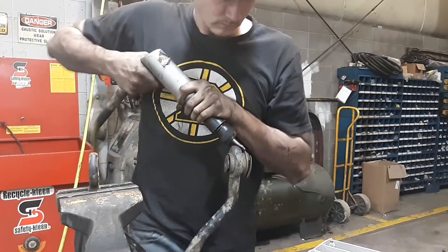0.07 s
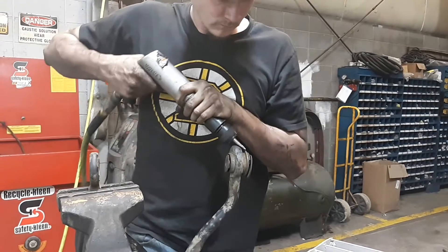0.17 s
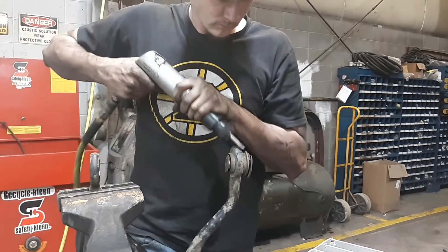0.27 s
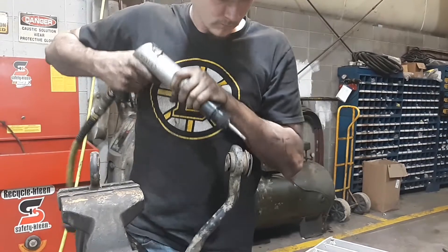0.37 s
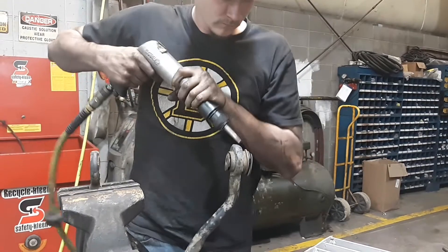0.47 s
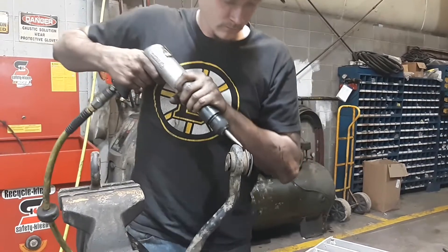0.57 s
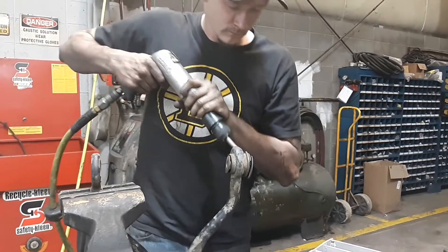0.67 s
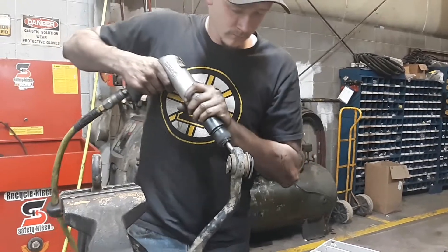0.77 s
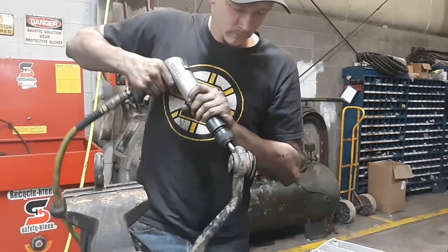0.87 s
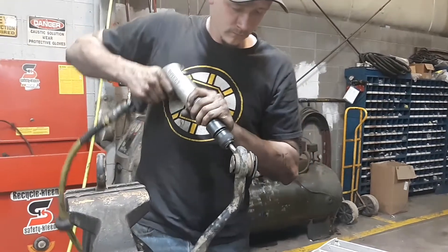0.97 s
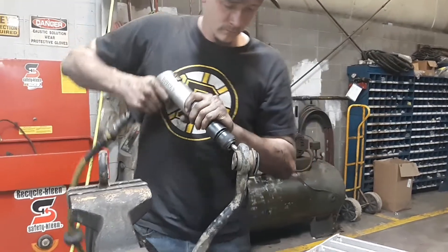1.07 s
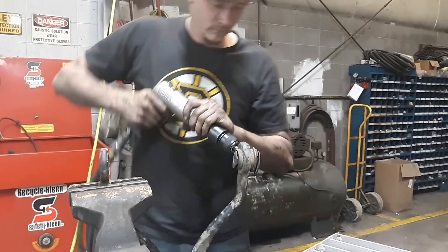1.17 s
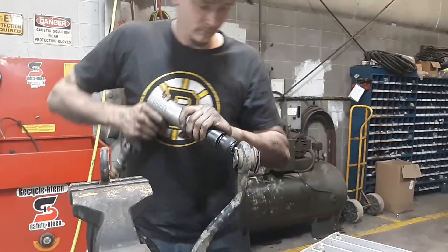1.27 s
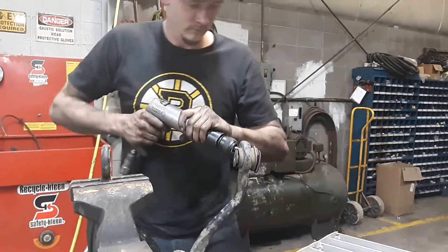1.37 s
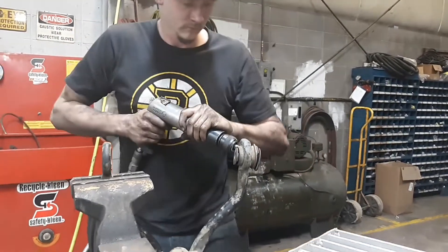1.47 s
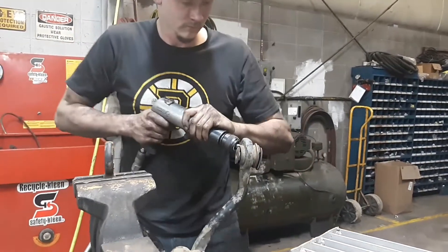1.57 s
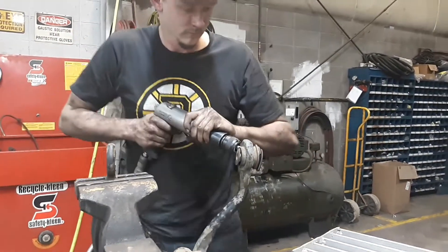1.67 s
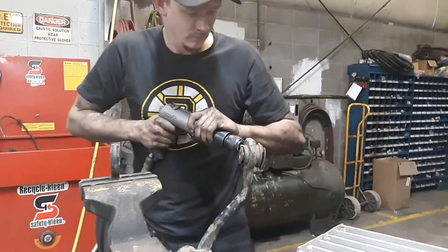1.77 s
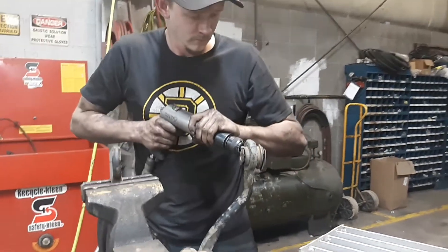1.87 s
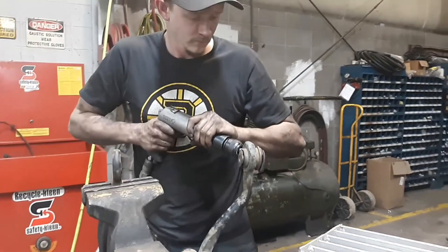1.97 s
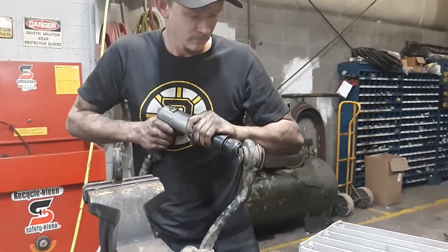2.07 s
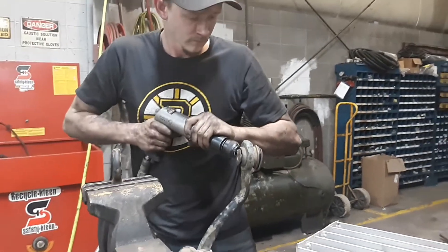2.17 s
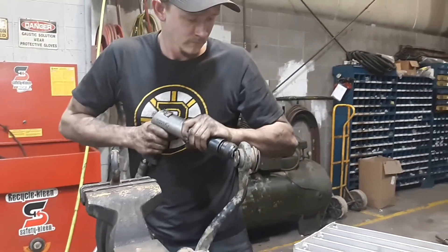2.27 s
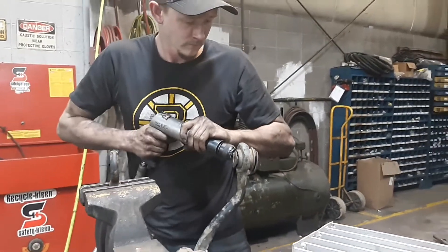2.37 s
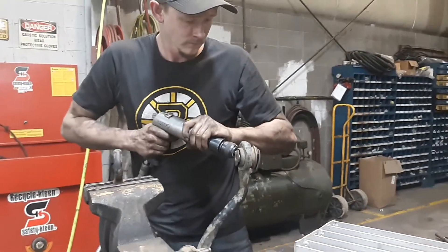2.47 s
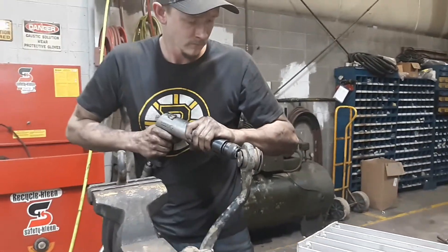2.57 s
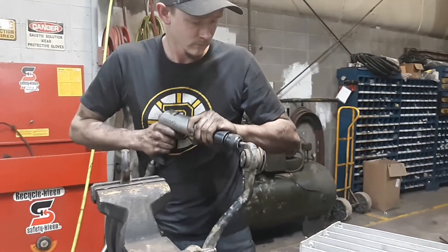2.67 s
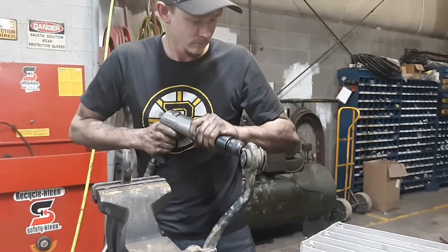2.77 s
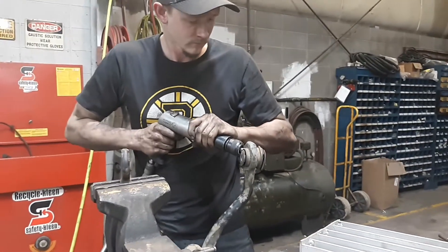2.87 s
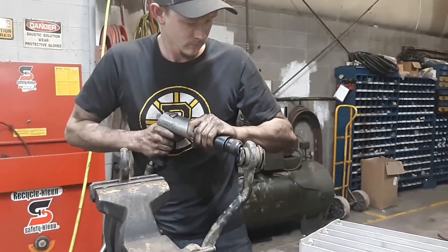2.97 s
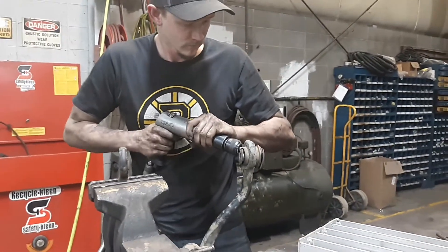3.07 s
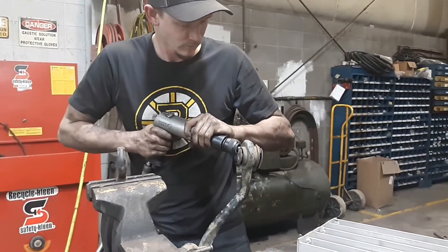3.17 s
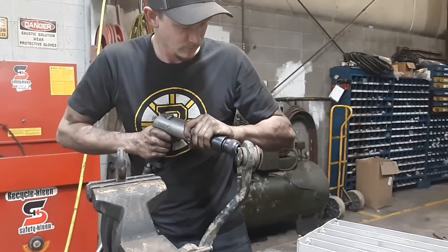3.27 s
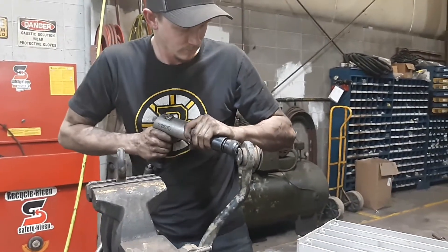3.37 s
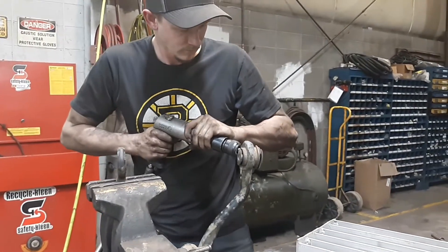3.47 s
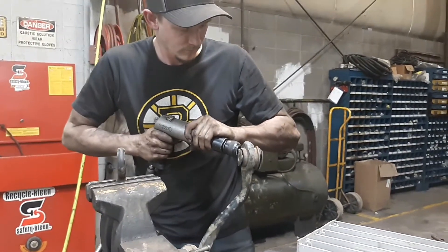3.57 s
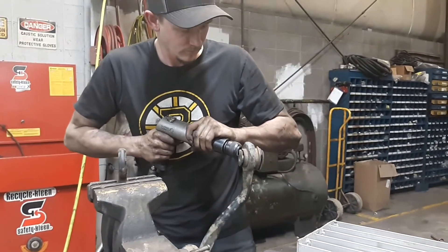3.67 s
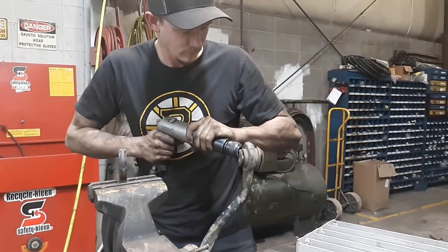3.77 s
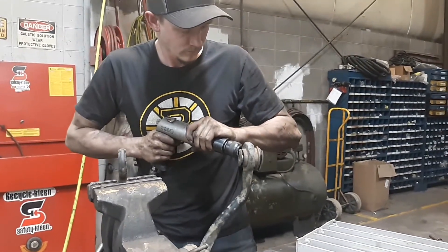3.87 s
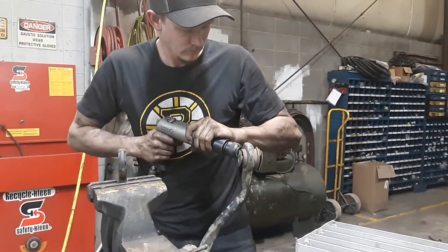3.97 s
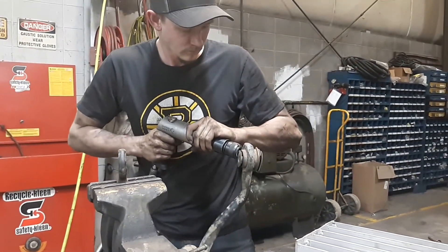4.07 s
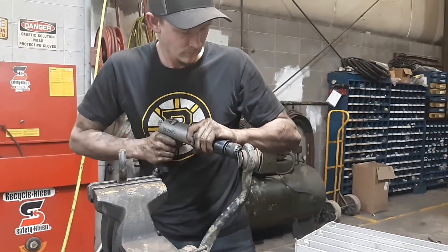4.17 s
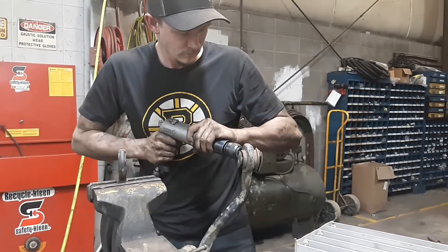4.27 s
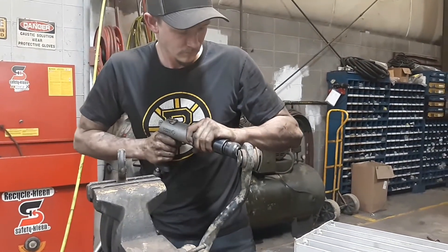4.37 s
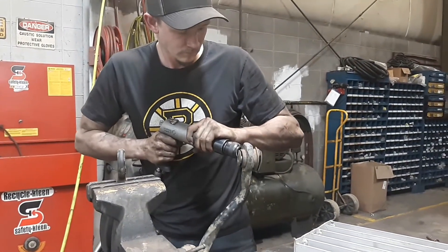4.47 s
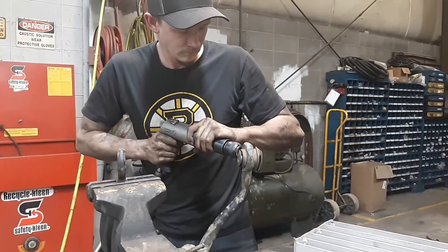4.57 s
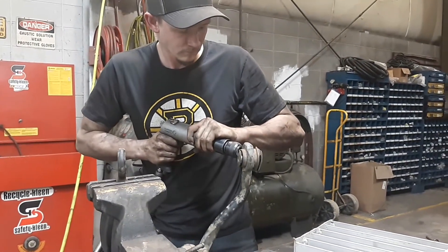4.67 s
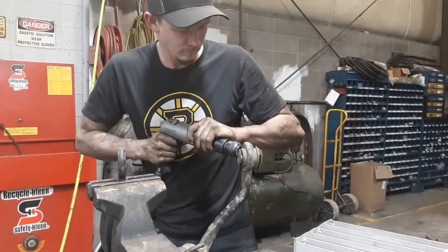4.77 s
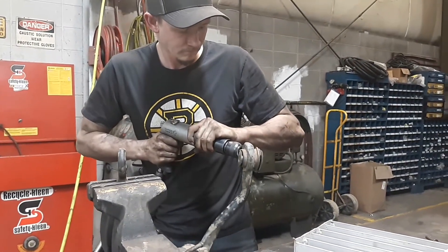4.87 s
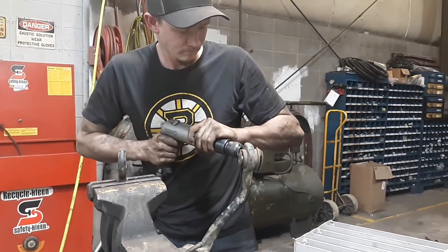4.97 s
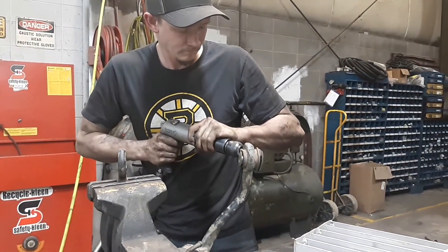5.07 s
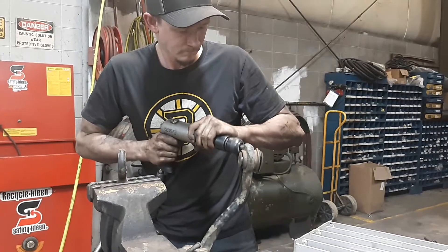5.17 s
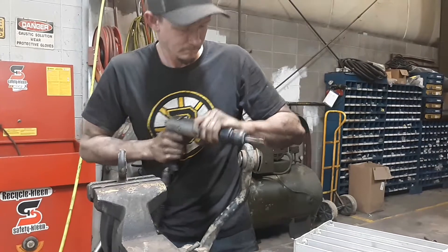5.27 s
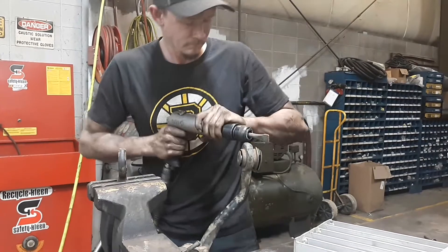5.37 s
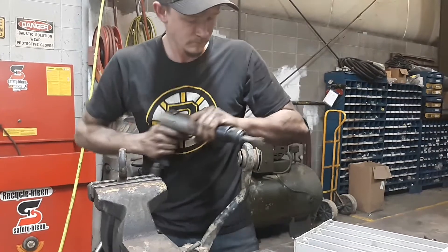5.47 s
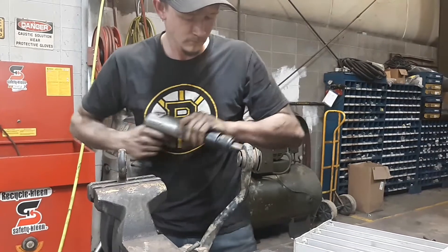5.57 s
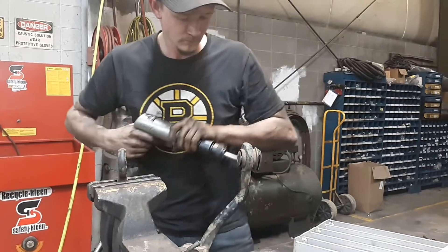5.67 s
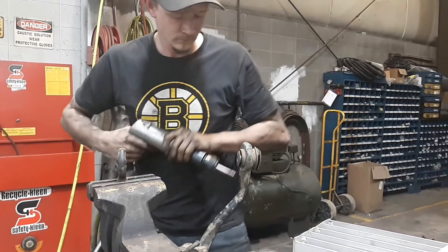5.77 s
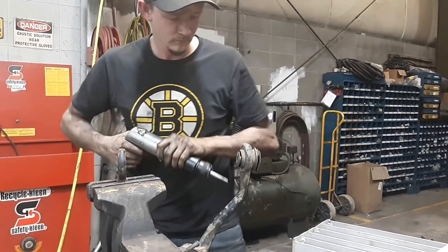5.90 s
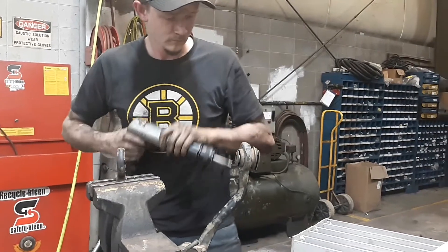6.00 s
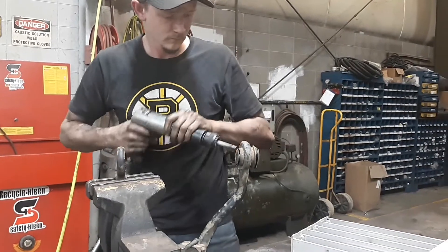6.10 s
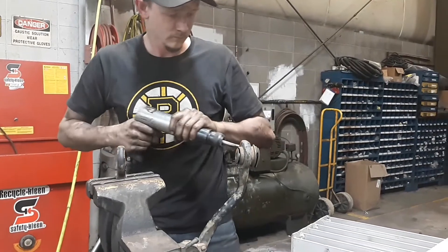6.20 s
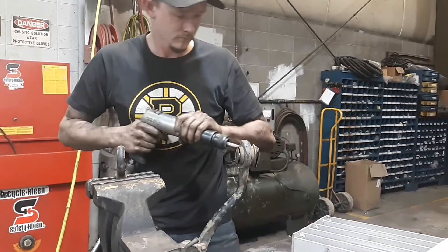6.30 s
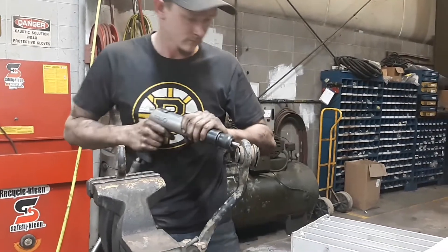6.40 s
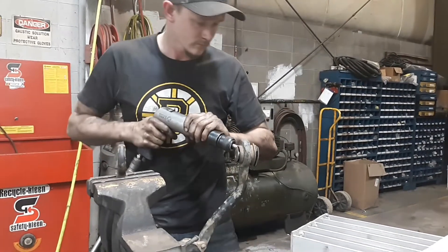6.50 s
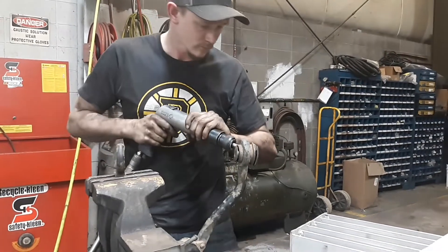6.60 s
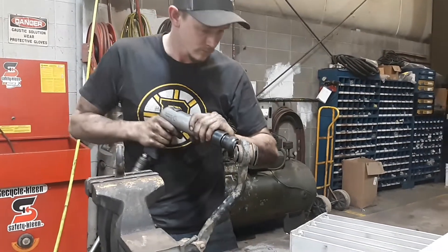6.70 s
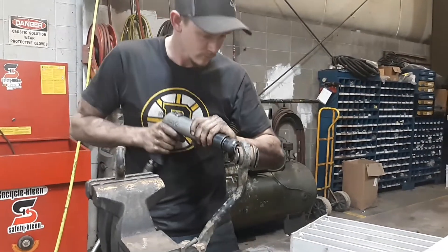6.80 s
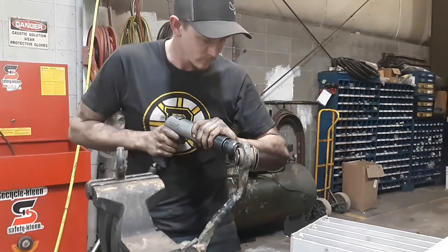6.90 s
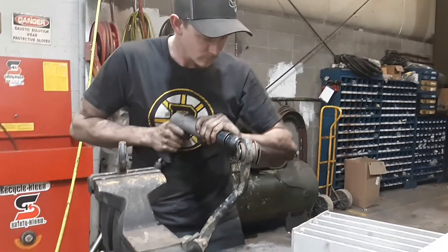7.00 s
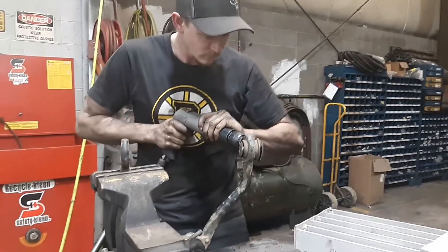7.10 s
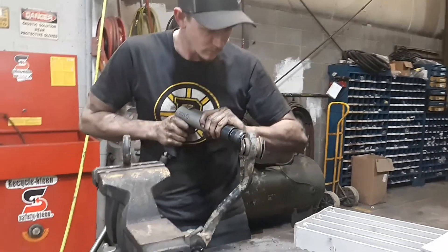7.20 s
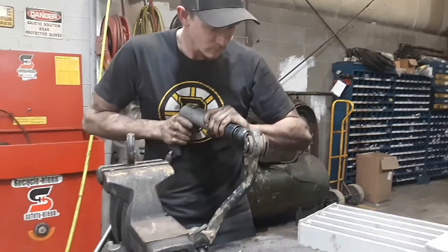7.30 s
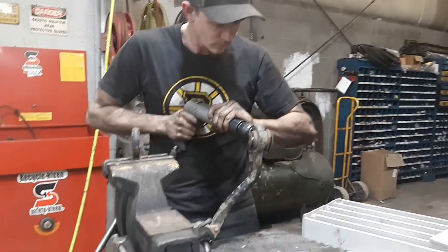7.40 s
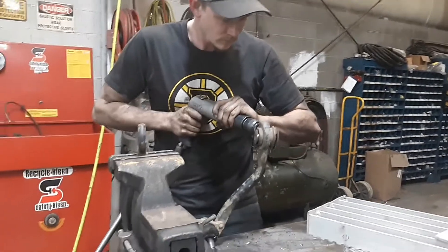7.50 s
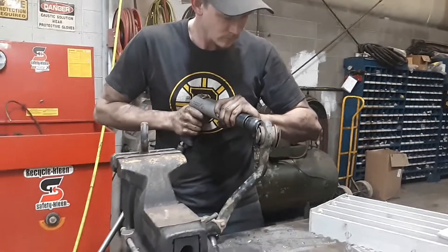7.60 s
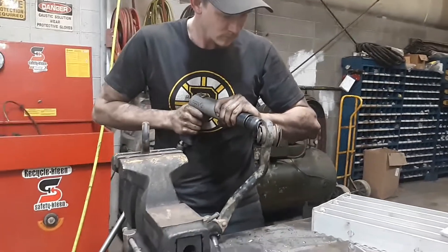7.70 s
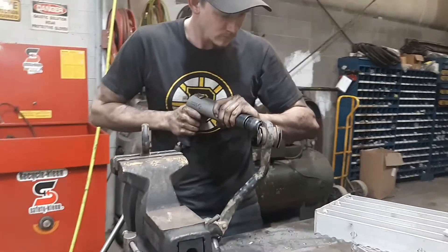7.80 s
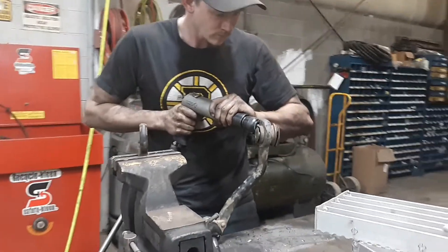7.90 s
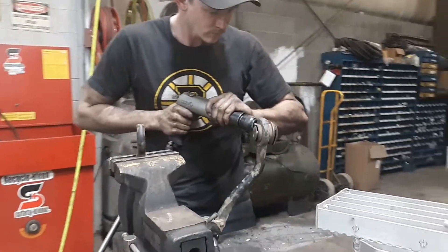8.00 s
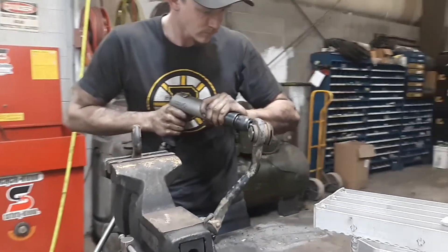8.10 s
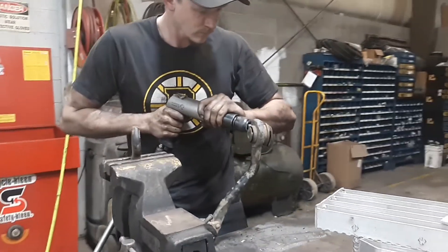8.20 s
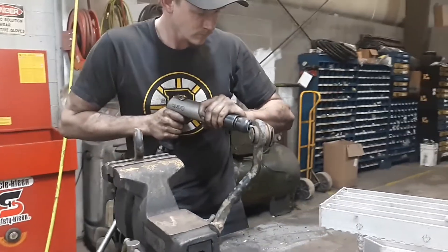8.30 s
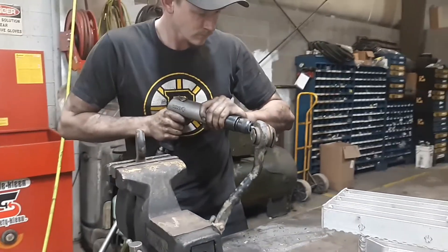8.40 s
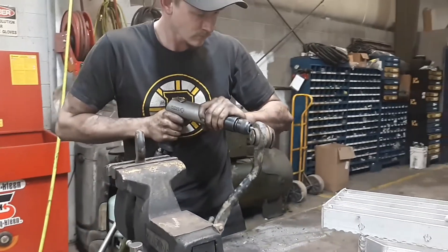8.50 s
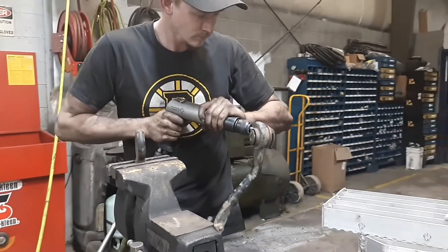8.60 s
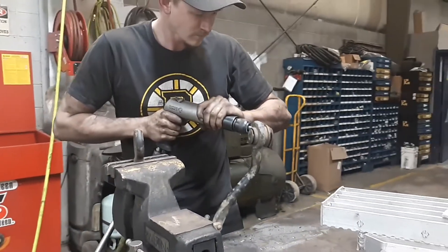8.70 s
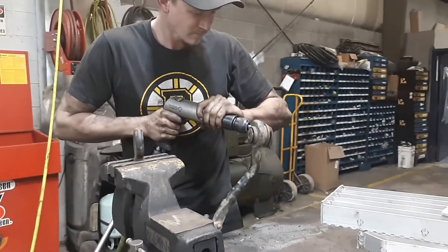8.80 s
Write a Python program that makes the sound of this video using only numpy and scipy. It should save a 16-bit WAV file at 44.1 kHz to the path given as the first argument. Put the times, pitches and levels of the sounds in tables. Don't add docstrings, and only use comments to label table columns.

```python
import sys
import numpy as np
from scipy import signal
from scipy.fft import rfft, irfft, next_fast_len
from scipy.io import wavfile
from scipy.ndimage import uniform_filter1d, map_coordinates

SR = 44100
rng = np.random.default_rng(int(sys.argv[2]) if len(sys.argv) > 2 else 0)


def elevation(decibels):
    levels = np.asarray(decibels, float)
    return 10 ** (levels / 20)


def waveform_to_disk(signal):
    frames = np.transpose(np.atleast_2d(signal))
    scaled = np.clip(frames, -1, 1) * 32767
    samples = np.round(scaled).astype(np.int16)
    wavfile.write(sys.argv[1], SR, samples)


N = 390285
LEAD, SPAN = SR // 2, SR // 16

# first blow in seconds, last blow in seconds,
# rate in blows per second, chisel ring in dB, arm ring in dB.
STEADY_SPELLS = [(-.344, .004, 34.5, -12, -19.5), (.031, .059, 35, -12.5, -19),
                 (1.979, 2.01, 32, -24, -17.5), (2.041, 2.08, 25, -20, -14), (2.12, 2.12, 25, -18, -20),
                 (2.16, 2.16, 25, -18, -16), (2.194, 2.227, 30, -16, -16.5), (2.26, 2.326, 30, -7.5, -19),
                 (3.301, 3.361, 33, -12, -21), (3.422, 3.635, 33, -8.5, -20),
                 (3.665, 3.908, 33, -6.5, -19.5), (4.364, 4.452, 34, -3.5, -19.5),
                 (4.483, 4.546, 32, -10, -19.5), (4.58, 4.651, 28, -9.5, -21.5), (4.72, 4.783, 16, -6, -19),
                 (4.812, 5.069, 35, -5, -20), (5.098, 5.182, 35, -10, -19), (5.211, 5.24, 34, -20, -20),
                 (5.27, 5.27, 34, -30, -30), (7.494, 7.494, 30, -4, -15), (7.527, 7.527, 30, -5, -12),
                 (7.858, 7.928, 29, -10, -15.5), (7.964, 8.038, 28, -10, -15.5),
                 (8.071, 8.071, 29, -9, -16), (8.105, 8.105, 29, -24, -15.5), (8.17, 8.2, 34, -17, -17.5),
                 (8.229, 8.229, 34, -12, -18), (8.258, 8.258, 34, -22, -20), (8.288, 8.288, 34, -11, -19),
                 (8.317, 8.345, 35, -18, -17.5), (8.374, 8.545, 35, -16.5, -17.5),
                 (8.573, 8.601, 35, -17, -19), (8.63, 8.83, 35, -16, -17.5)]
# time in seconds, crack in dB,
# exhaust in dB, arm ring in dB.
STRAY_BLOWS = [(.088, -36, -27, -27), (.134, -42.5, -44, -33), (1.89, -24, -24, -57),
               (1.927, -25, -22.5, -55), (1.957, -27, -19, -48), (2.383, -31, -48, -29.5),
               (3.213, -34.5, -25.5, -54.5), (3.24, -23.5, -19, -24), (3.281, -20.5, -23.5, -28),
               (3.402, -24, -21.5, -33), (4.278, -31, -26, -54), (4.313, -26.5, -20, -50),
               (4.345, -27.5, -24.5, -37), (4.699, -29.5, -24.5, -51), (4.763, -26, -20.5, -26.5),
               (5.292, -24.5, -36.5, -41), (5.33, -28, -38, -50), (5.4, -30, -40, -40),
               (7.402, -31, -23, -47), (7.438, -27, -22, -60.5), (7.472, -24.5, -16.5, -51),
               (7.575, -27.5, -23, -13), (7.593, -29, -22, -20), (7.742, -26.5, -32, -52),
               (7.773, -23, -26.5, -49), (7.8, -22.5, -20.5, -56.5), (7.835, -26, -20.5, -47.5),
               (8.149, -23, -25, -26)]
SEATED_CRACK_DB, SEATED_EXHAUST_DB = -22, -21.5
SCATTER_S, SCATTER_DB = .0005, [1.8, 1.6, 1.6, 1.4]
STRAY_CHISEL_DB = 1.5
LET_GO_S, LET_GO_DB = .1, -7


def blows():
    even = []
    for first, last, rate, chisel_db, arm_db in STEADY_SPELLS:
        for s in np.linspace(first, last, round((last - first) * rate) + 1):
            even.append((s, SEATED_CRACK_DB, SEATED_EXHAUST_DB, chisel_db, arm_db))
    even = np.array(even)
    even = even + rng.standard_normal(even.shape) * [SCATTER_S, *SCATTER_DB]
    even[:-1, 2] += LET_GO_DB * (np.diff(even[:, 0]) > LET_GO_S)
    stray = [(s, crack, vent, (crack + vent) / 2 + STRAY_CHISEL_DB, arm) for s, crack, vent, arm in STRAY_BLOWS]
    rows = np.vstack([even, stray])
    return rows[np.argsort(rows[:, 0])]


# time in seconds, chisel pitch in Hz, chisel left-right balance in dB,
# shank ring in dB, arm pitch in Hz.
TOOL_GRIP = [(0, 3400, -17, -11.5, 940), (.2, 3400, -7, -10, 930), (1.9, 3959, -23, -7.5, 898.1),
             (2.4, 3967, -20.5, -2, 905.8), (3.3, 3986, -16.5, -8.5, 911.3), (3.9, 3946, -37, -10, 910),
             (4.4, 3954, -18, -9, 911.9), (5.2, 3943, -17.5, -8.5, 914), (7.49, 3960, -7, -7, 900),
             (7.53, 3980, -7, -7, 960), (7.58, 3980, -7, -7, 925), (7.9, 4013, -20, -2, 898.3),
             (8.15, 4056, -16.5, -4, 928.6), (8.85, 4077, -18, -8.5, 961.5)]
# time in seconds, twisting modes in dB, their centre in Hz,
# crack in dB, neck ring in dB.
CHISEL_BITE = [
    (.1, 6, 1560, .1, -17),
    (1.9, 4, 1640, 0.1, -24),
    (2.4, 3, 1660, 0.1, -19),
    (3.3, 1, 1650, 0.1, -25),
    (3.9, 1, 1650, 0.1, -25),
    (5.3, -.5, 1640, .5, -25),
    (7.5, -3, 1680, -.5, -18),
    (8.1, -4, 1680, 1.5, -19),
    (8.3, -3, 1700, 2, -16),
    (8.85, 0.1, 1760, 2, -16),
]


def hammer():
    s, crack_db, exhaust_db, chisel_db, arm_db = blows().T[:, :, None]
    chisel_hz, pan_db, shank_db, arm_hz = curves(TOOL_GRIP, s)
    twist_db, twist_hz, bite_db, neck_db = curves(CHISEL_BITE, s)
    crack_db = crack_db + bite_db
    spread = impact_crack(s, crack_db) + exhaust_jet(s, exhaust_db) + piston_thump(s, exhaust_db)
    spread = spread + neck_ring(s, chisel_hz, neck_db) + arm_clank(s, arm_db)
    chisel = chisel_ring(s, chisel_hz, chisel_db, pan_db) + shank_ring(s, crack_db + shank_db)
    return spread, chisel, arm_ring(s, arm_hz, arm_db, twist_hz, twist_db)


# frequency in Hz, density in dB per Hz.
CRACK_SPECTRUM = [(60, -60), (900, -14), (2500, -3), (5500, -0.5), (6900, -2.5), (7600, -12), (9700, -11),
                  (13000, -5.5), (16000, -12)]


def impact_crack(s, db):
    burst = laid(s, elevation(db + 2.0) * swell(np.arange(SPAN) / SR, 0.002136))
    return coloured(noise(channels=2, alike=0.38) * burst, CRACK_SPECTRUM, 10500, 15500)


# frequency in Hz, density in dB per Hz.
EXHAUST_SPECTRUM = [(60, -38.5), (250, -14), (500, -17.5), (1000, -14.5), (2200, -3.5), (4200, 2),
                    (5600, -3), (6800, -4.5), (7500, -15), (9600, -10.5), (16000, -16.5)]


def exhaust_jet(s, db):
    t = np.arange(SPAN) / SR
    vent = np.minimum(np.diff(s, axis=0, append=s[-1:] + 1) - .005, .03)
    gate = np.clip(t / .0015, 0, 1) * np.clip((vent - t) / 0.0034, 0, 1) * elevation(-60 * t)
    first = np.diff(s, axis=0, prepend=s[:1]) > .12
    trigger = laid(s - .012, first * elevation(db - 29.0) * swell(t, 0.011))
    eddies = elevation(2.36 * np.resize(wobble(260), N + LEAD))
    flow = laid(s, elevation(db - 2.5) * gate) + trigger
    return coloured(noise(channels=2, alike=0.45) * eddies * flow, EXHAUST_SPECTRUM, 4500, 7000)


# frequency in Hz, density in dB per Hz.
THUMP_SPECTRUM = [(30, -41), (100, -14), (220, -1), (450, -2.5), (700, -10.5), (3000, -59.5)]


def piston_thump(s, db):
    push = elevation(db - 6 + 1.5 * luck(s)) * swell(np.arange(SPAN) / SR, 0.00635)
    return coloured(noise(channels=2, alike=.45) * laid(s - .004, push), THUMP_SPECTRUM, 150, 600)


def chisel_ring(s, hz, db, pan_db):
    t = np.arange(SPAN) / SR
    choke = swell(t, 0.00421) + elevation(-10 - 60 * t / 0.088) * (1 - np.exp(-t / .003))
    stray = 0.0045 + 0.012 * np.clip((-9 - db) / 6, 0, 1)
    phase = 2 * np.pi * hz * (1 + stray * luck(s)) * t + luck(s)
    ring = elevation(db + 2.5) * choke * np.sin(phase)
    return np.array([laid(s - .0012, elevation(side * pan_db) * ring) for side in (1, 0)])


def shank_ring(s, db):
    t = np.arange(SPAN) / SR
    hz = 9650 * (1 + .016 * luck(s))
    return laid(s, elevation(db + 2 + 2 * luck(s)) * swell(t, 0.0026) * np.sin(2 * np.pi * hz * t))


def neck_ring(s, chisel_hz, db):
    t = np.arange(SPAN) / SR
    hz = chisel_hz * (.88 + .09 * luck(s))
    return laid(s, elevation(db + 2.5 * luck(s)) * elevation(2.5) * swell(t, .002) * np.sin(2 * np.pi * hz * t))


# ratio to its pitch, level in dB, delay in seconds.
BENDING_MODES = [(.94, -3, .016), (1.02, 3.5, 0.017), (1.11, -2.5, .016), (1.22, -8, .013),
                 (1.36, -6.5, .012)]
# ratio to their centre, level in dB, delay in seconds.
TWISTING_MODES = [(.9, -8, .01), (.97, -4.5, .009), (1.04, -5, .011)]


def arm_ring(s, arm_hz, arm_db, twist_hz, twist_db):
    bending = modes(BENDING_MODES, arm_hz, arm_db - 5.3, s)
    return laid(s, bending + modes(TWISTING_MODES, twist_hz, arm_db - 5.6 + twist_db, s))


def modes(table, hz, db, s):
    t = np.arange(SPAN) / SR
    total = 0
    for ratio, level, delay in table:
        phase = 2 * np.pi * ratio * hz * (1 + .011 * luck(s)) * t + .6 * luck(s)
        total = total + elevation(db + level + 1.5 * luck(s)) * swell(t, delay, sharp=6) * np.sin(phase)
    return total


# frequency in Hz, density in dB per Hz.
CLANK_SPECTRUM = [(60, -48), (350, -8.5), (700, -8), (930, -0.5), (1300, -4), (1650, -2), (2200, -13.5),
                  (6000, -60)]


def arm_clank(s, db):
    swells = laid(s, elevation(db - 9.2) * swell(np.arange(SPAN) / SR, 0.0145))
    return coloured(noise(channels=2, alike=0.717) * swells, CLANK_SPECTRUM, 820, 1118.6)


# start in seconds, pitch in Hz, level in
# dB, 60 dB decay in seconds.
STRAY_RINGS = [(.085, 12600, -34.5, 0.186), (2.293, 5500, -27, .6), (2.335, 5470, -28.5, .55),
               (2.33, 12880, -48, .3), (5.845, 8500, -69, .08), (5.845, 8900, -70, .08),
               (6.828, 9150, -80, 0.25), (6.828, 8700, -82, .2), (6.662, 4000, -62, .1),
               (.062, 3370, -28, .55), (.03, 1600, -22, .3), (2.34, 3250, -33, .55), (2.33, 4000, -31, .5),
               (6.485, 2150, -63, .15), (7.593, 4050, -14, .14), (7.54, 4000, -17, .14),
               (.09, 3050, -35, .7), (.09, 3750, -34, .6), (.07, 1500, -22, .25), (7.605, 3000, -21, .15),
               (3.93, 1000, -32, .6), (3.93, 1630, -30, .4), (2.36, 890, -31, .5), (5.2, 950, -22, .45),
               (5.322, 62, -41, .12), (7.51, 12900, -36, .25)]


def rings():
    s, hz, db, t60 = np.transpose(STRAY_RINGS)[:, :, None]
    t = np.arange(SR // 2) / SR
    knots = rng.standard_normal((len(s), 16))
    flutter = np.array([np.interp(t, np.linspace(0, .5, len(row)), row) for row in knots])
    level = elevation(db - 60 * t / t60 + 4 * flutter) * (1 - np.exp(-t / .002))
    return laid(s, level * np.sin(2 * np.pi * hz * t + .8 * flutter))


# time in seconds, thud in dB, tick
# in dB, tick pitch in Hz.
CHISEL_KNOCKS = [(.004, -27, -60, 3000), (.035, -27, -60, 3000), (.075, -28, -60, 3000),
                 (.302, -52.5, -46.5, 13000), (.531, -59.5, -47, 11500), (.62, -65, -54, 9476),
                 (1.097, -66.5, -63, 1700), (1.159, -58, -47.5, 4494), (1.168, -62, -66, 800),
                 (1.182, -54.5, -51.5, 3693), (1.522, -57.5, -75.5, 900), (1.535, -52.5, -78, 700),
                 (1.56, -57, -80, 700), (2.799, -66, -65, 6200), (2.85, -64, -55, 9500),
                 (5.318, -27.5, -60.5, 3001), (6.418, -64, -62, 1400), (6.49, -69, -67, 2197),
                 (6.66, -60, -50, 3400), (6.706, -51, -48, 4000), (6.667, -64, -62, 1450),
                 (6.714, -60, -60, 900), (6.741, -54, -46.5, 3900), (6.752, -60, -56, 1550),
                 (6.768, -63, -63, 1450), (6.708, -75, -56, 9500), (6.829, -75, -64, 8800),
                 (6.815, -72, -66, 3000), (6.743, -75, -60, 6300), (.512, -70, -58, 6000),
                 (.668, -72, -62, 6500), (1.893, -60, -37, 6300), (1.906, -60, -39, 6700),
                 (1.932, -60, -38, 6000), (1.947, -60, -39, 6600), (2.014, -60, -35, 6300),
                 (7.33, -62, -67.5, 4003), (1.452, -64, -70, 1500), (1.548, -70, -68, 4200),
                 (5.115, -29, -60, 3000), (8.366, -26, -60, 3000), (8.708, -26, -60, 3000),
                 (8.736, -26, -60, 3000)]
# pitch in Hz, level in dB.
TICK_CHATTER = [(1000, 33), (4500, 34), (9000, 14.5)]
# frequency in Hz, density in dB per Hz.
TICK_SPECTRUM = [(100, -60.5), (1000, -9.5), (1600, -5), (2400, -8), (3700, 4.5), (5500, -6), (7500, -21),
                 (9500, -20), (16000, -36.5)]
# frequency in Hz, density in dB per Hz.
THUD_SPECTRUM = [(30, -50.5), (110, -18), (200, -1.5), (450, -1), (750, -3.5), (1300, -14.5), (4000, -71)]


def knocks():
    s, thud_db, tick_db, tick_hz = np.transpose(CHISEL_KNOCKS)[:, :, None]
    t = np.arange(SPAN) / SR
    fall = elevation(tick_db - 60 * t / .026) * (1 - np.exp(-t / .0007))
    tick = coloured(noise(channels=2, alike=0.62) * laid(s, elevation(8.5) * fall), TICK_SPECTRUM, 2800, 10000)
    slow = signal.fftconvolve(rng.standard_normal(fall.shape), np.hanning(60)[None] / 23, 'same')
    chatter = slow * np.sin(2 * np.pi * tick_hz * t)
    pitched = laid(s, elevation(along(TICK_CHATTER, tick_hz)) * fall * chatter)
    thud = noise(channels=2, alike=.9) * laid(s, elevation(thud_db + 2.0) * swell(t, .012))
    return tick + pitched, coloured(thud, THUD_SPECTRUM, 150, 1200)


# time in seconds, leak in dB, whine in dB.
SHOP_AIR = [(0.75, -74.5, -76.5), (0.95, -80.5, -71.5), (1.25, -82, -70.5), (1.4, -75, -69),
            (1.58, -84, -68.5), (1.75, -79, -69), (1.9, -82, -69), (3.15, -83, -71), (5.7, -83, -70),
            (5.8, -82.5, -80), (6.38, -80, -82), (6.45, -77, -80), (6.6, -76, -75), (6.78, -78, -72),
            (6.9, -81, -72), (7.0, -82, -72.5), (7.05, -73, -72), (7.1, -74.5, -73), (7.2, -76.5, -88),
            (7.34, -76, -79)]


def shop():
    leak_db, whine_db = curves(SHOP_AIR, np.arange(N) / SR)
    return air_leak(leak_db) + compressor_hum() + whine(whine_db) * elevation([[-1], [1]]) + rumble()


# time in seconds, lower pitch in Hz, upper pitch in Hz,
# level over the leak in dB.
JET_WHISTLES = [
    (1.0, 4500, 9300, -13),
    (5.8, 4700, 9300, -11),
    (6.3, 4750, 9400, -.5),
    (6.6, 4700, 9300, -1.5),
    (6.95, 4500, 9200, -2),
    (7.05, 4480, 9000, 2),
    (7.18, 4450, 9250, 3),
    (7.25, 4150, 9350, 2),
    (7.4, 4100, 9300, 1),
]
# frequency in Hz, density in dB per Hz.
LEAK_SPECTRUM = [(700, -25), (1500, -3), (3000, 8.5), (4400, 16), (4900, 7.5), (6800, 7), (7800, -8),
                 (9300, 3.5), (10300, 0), (16000, -6)]


def air_leak(leak_db):
    hiss_part = coloured(noise(channels=2, alike=0.046), LEAK_SPECTRUM, 6800, 18000)[:, :N]
    low_hz, high_hz, jet_db = curves(JET_WHISTLES, np.arange(N) / SR)
    whistles = band(low_hz, size=150) + elevation(-5.0) * band(high_hz, size=70)
    return elevation(leak_db + wobble(12)) * hiss_part + elevation(leak_db + jet_db + 2.2 * wobble(15)) * whistles


def band(hz, size):
    slow = uniform_filter1d(rng.standard_normal((2, N)), size=size, axis=1)
    return np.sqrt(2 * size) * slow * np.sin(2 * np.pi * np.cumsum(hz) / SR)


# multiple of its speed, level in dB.
HUM_HARMONICS = [(2, -75.5), (3, -67.5), (4, -74), (5, -74.5), (6, -79.5), (7, -76.5), (8, -80)]


def compressor_hum():
    turn = 2 * np.pi * np.cumsum(76 * (1 + .004 * wobble(3))) / SR
    return sum(elevation(db + 3.4 * wobble(13)) * np.sin(k * turn + .3 * wobble(10)) for k, db in HUM_HARMONICS)


def whine(db):
    t = np.arange(N) / SR
    tones = np.sin(2 * np.pi * 2449.5 * t + .35 * wobble(30)) + elevation(-12) * np.sin(2 * np.pi * 2256 * t)
    return elevation(db + 5.3 + 1.5 * wobble(45)) * tones


# frequency in Hz, density in dB per Hz.
RUMBLE_SPECTRUM = [(30, -25), (100, -24.5), (180, -17.5), (230, -6.5), (400, -13.5), (600, -16),
                   (1460, -22.5), (2400, -19), (3050, -25), (7000, -45.5), (16000, -59)]


def rumble():
    bass, treble = noise(channels=2, alike=0.967), noise(channels=2, alike=0.055)
    blend = filtered(bass, lambda hz: 1 / np.sqrt(1 + (hz / 800) ** 2))
    blend = blend + filtered(treble, lambda hz: 1 / np.sqrt(1 + (800 / (hz + 1)) ** 2))
    return elevation(-63.5 + 1.9 * wobble(5)) * coloured(blend, RUMBLE_SPECTRUM, 150, 1200)[:, :N]


# start in seconds, length in seconds, first pitch in Hz, last pitch in Hz, level in dB.
SLEEVE_BRUSH = (1.3, .19, 12000, 15000, -76)
# time in seconds, hiss in dB.
HOSE_BLEED = [
    (.2, -76),
    (1.1, -78.5),
    (1.45, -84),
    (2.0, -85.5),
]
# frequency in Hz, density in dB per Hz.
HISS_SPECTRUM = [(2000, -40), (7000, -12), (9000, -8), (12000, 0), (16000, -2)]


def hiss():
    start, length, from_hz, to_hz, db = SLEEVE_BRUSH
    t = np.arange(N) / SR
    u = np.clip((t - start) / length, 0, 1)
    white = rng.standard_normal((2, N))
    carrier = np.sin(2 * np.pi * np.cumsum(from_hz + (to_hz - from_hz) * u) / SR)
    slide = uniform_filter1d(white, size=24, axis=1) * carrier
    steady = elevation(curves(HOSE_BLEED, t)[0]) * coloured(white, HISS_SPECTRUM, 8000, 16000)
    return steady + elevation(db + 17) * np.sin(np.pi * u ** 2) * slide


# frequency in Hz, 60 dB decay in seconds.
GARAGE_DECAY = [(60, 0.13), (250, 0.74), (1000, 0.651), (2300, .96), (3300, .86), (4300, 0.74),
                (5800, 0.55), (8000, 0.51), (10500, 0.3921), (15000, 0.0541)]
# delay in seconds, level in dB.
NEAR_WALLS = [(.0045, -17), (.0098, -10), (0.0166, -10), (.022, -18.5)]
TAIL_TURNS_PER_S = 2.3


def garage(near, spread):
    hz, t, z = signal.stft(rng.standard_normal((2, 2, SR)), SR, nperseg=256)
    tail = signal.istft(z * elevation(-60 * t / along(GARAGE_DECAY, hz)[:, None]), SR, nperseg=256)[1]
    tail = elevation(-6.0) * np.pad(tail / np.linalg.norm(tail[0, 0]), [(0, 0), (0, 0), (SR // 100, 0)])
    sent = spread.mean(0)
    turn = 2 * np.pi * TAIL_TURNS_PER_S * np.arange(N + LEAD) / SR
    turned = sent * [np.cos(turn), np.sin(turn)]
    m = next_fast_len(N + LEAD + 2 * SR)
    wet = irfft(np.sum(rfft(turned, m)[:, None] * rfft(tail, m), 0), m)[:, :N + LEAD]
    walls = sum(elevation(db) * np.array([np.roll(sent, round(k * s * SR)) for k in (1, 1.06)])
                for s, db in NEAR_WALLS)
    direct = np.array([near[0], np.roll(near[1], 5)])
    return (direct + walls + wet)[:, LEAD:]


def along(points, hz):
    f, v = np.transpose(points)
    return np.interp(np.log(hz + 1), np.log(f + 1), v)


def curves(rows, s):
    at, *cols = np.transpose(rows)
    return [np.interp(s, at, c) for c in cols]


def filtered(x, response):
    m = next_fast_len(x.shape[-1] + 8192)
    return irfft(rfft(x, m) * response(np.fft.rfftfreq(m, 1 / SR)), m)[..., :x.shape[-1]]


def coloured(x, spectrum, lo_hz, hi_hz):
    grid = np.arange(SR // 2)
    inside = (grid > lo_hz) & (grid < hi_hz)
    power = np.sum(elevation(2 * along(spectrum, grid))[inside]) / len(grid)
    return filtered(x, lambda hz: elevation(along(spectrum, hz))) / np.sqrt(power)


def laid(s, rows):
    at = np.round(s * SR).astype(int) + LEAD + np.arange(rows.shape[1])
    return np.bincount(at.ravel(), rows.ravel(), N + LEAD + SR)[:N + LEAD]


def noise(channels, alike):
    own = rng.standard_normal((channels + 1, N + LEAD))
    return np.sqrt(alike) * own[0] + np.sqrt(1 - alike) * own[1:]


def wobble(rate):
    at = np.arange(0, N + 64, 64)
    knots = rng.standard_normal(int(N * rate / SR) + 4)
    return np.interp(np.arange(N), at, map_coordinates(knots, [at * rate / SR]))


def swell(t, peak, sharp=3):
    return (t / peak * np.exp(1 - t / peak)) ** sharp


def luck(s):
    return rng.standard_normal((len(s), 1))


CHISEL_WET_DB, ARM_WET_DB, TICK_WET_DB, THUD_WET_DB = -10, -8, -16, -9


def scene():
    (strokes, chisel, arm), (tick, thud) = hammer(), knocks()
    chisel = chisel + rings()
    spread = strokes + elevation(CHISEL_WET_DB) * chisel + elevation(ARM_WET_DB) * arm
    spread = spread + elevation(TICK_WET_DB) * tick + elevation(THUD_WET_DB) * thud
    return garage(strokes + chisel + arm + tick + thud, spread) + shop() + hiss()


# start in seconds, end in seconds.
HAMMER_RESTS = [
    (.06, 1.89),
    (5.3, 7.402),
]
GAIN_DB, WAIT_S, CREEP_DB_PER_S, CEILING_DB = 0.8265, 0.9883, 30.5, 17
LEFT_DB, SETTLE_S = 5.5, .1


def gain():
    t = np.arange(N) / SR
    db = GAIN_DB
    for a, b in HAMMER_RESTS:
        creep = (t < b) * np.clip((t - a - WAIT_S) * CREEP_DB_PER_S, 0, CEILING_DB)
        settle = (t >= b) * LEFT_DB * np.clip(2 - 2 * (t - b) / SETTLE_S, 0, 1)
        db = db + creep + settle
    return elevation(db)


def top_cut(x):
    return signal.sosfilt(signal.butter(12, 15950, fs=SR, output="sos"), x)


# frequency in Hz, left over right in dB.
PORT_COLOUR = [(100, -0.5), (1300, 0), (2400, -1), (4400, -3), (8000, 2), (15000, 2)]


def record(dry):
    x = dry * gain()

    def ports(hz):
        edge = np.clip((16000 - hz) / 300, 0, 1)
        return edge * elevation(along(PORT_COLOUR, hz) * np.array([[.5], [-.5]]))

    x = filtered(x, ports)
    x = x / (1 + np.abs(x) ** 5) ** (1 / 5)
    return top_cut(x)


dry = scene()
out = record(dry)
waveform_to_disk(out)
```